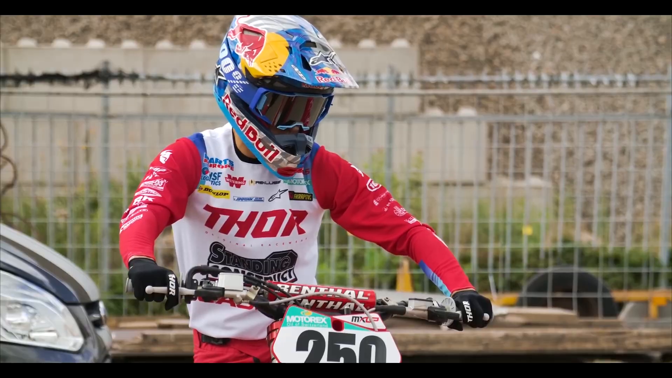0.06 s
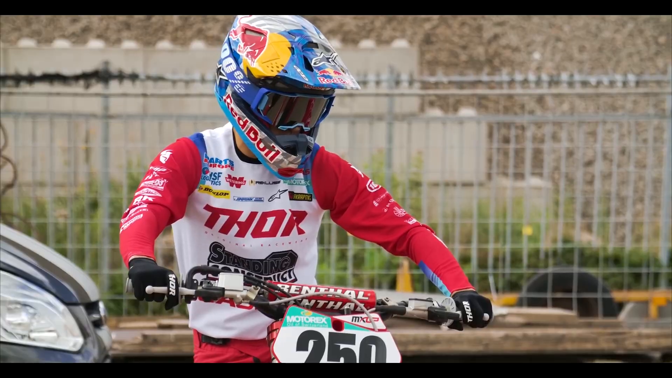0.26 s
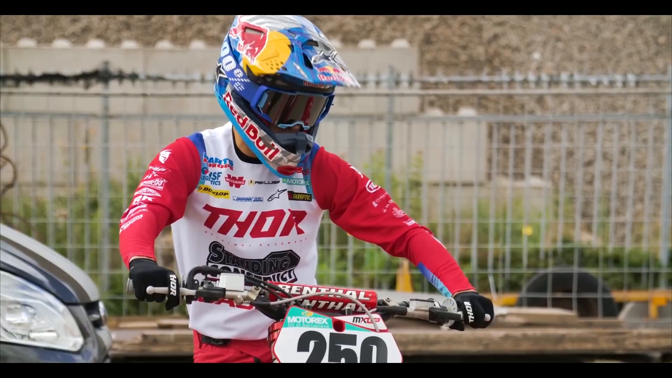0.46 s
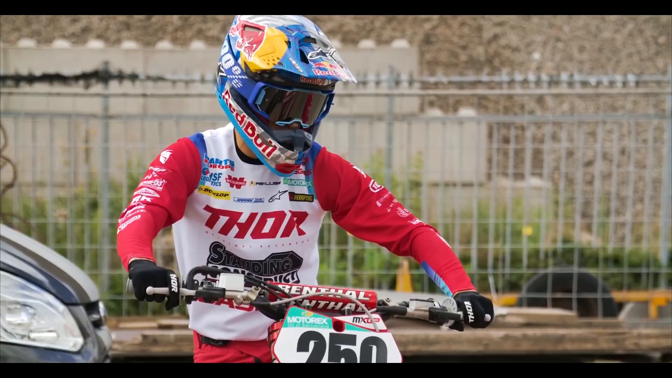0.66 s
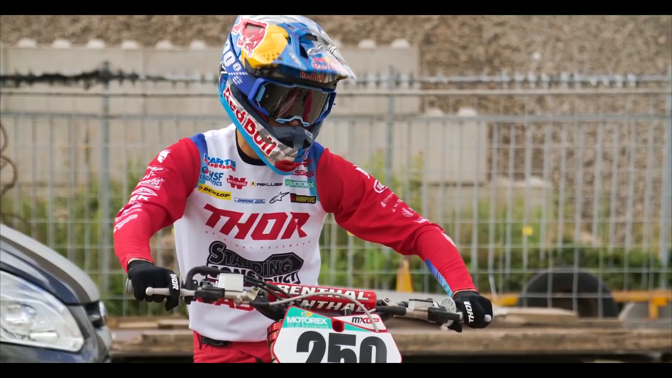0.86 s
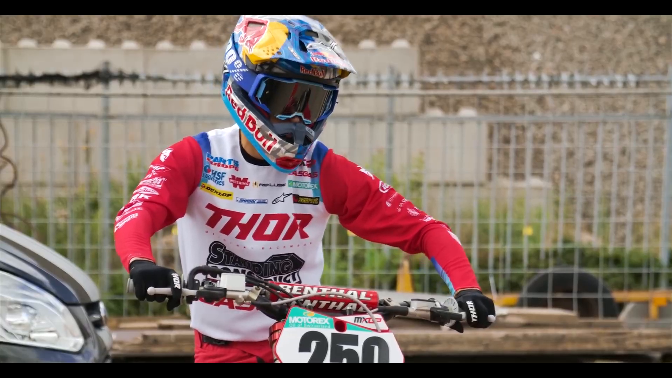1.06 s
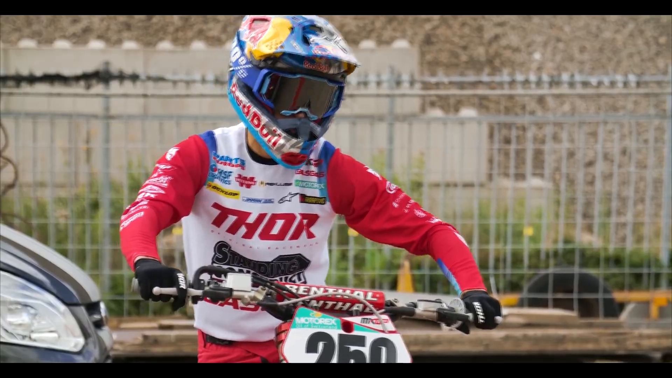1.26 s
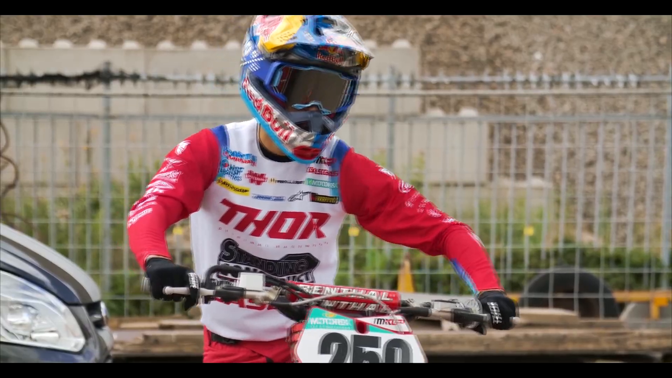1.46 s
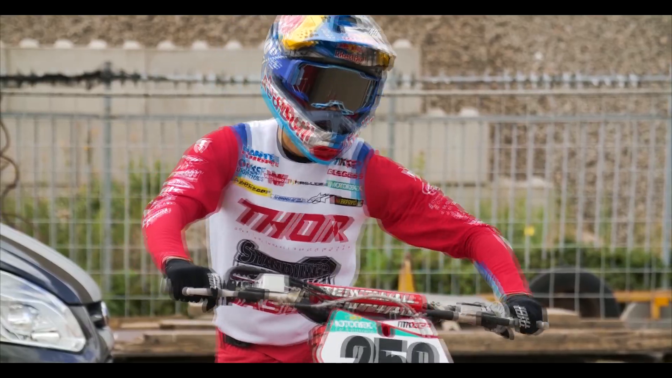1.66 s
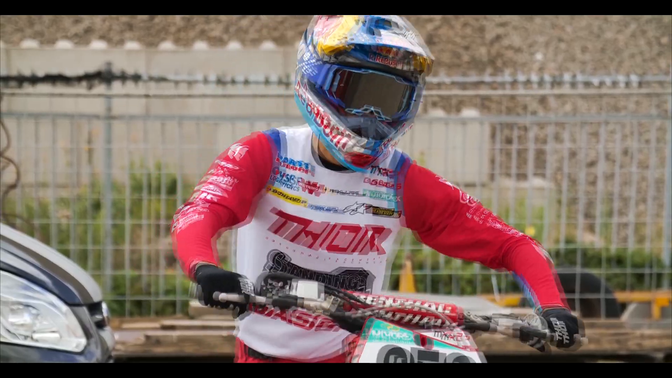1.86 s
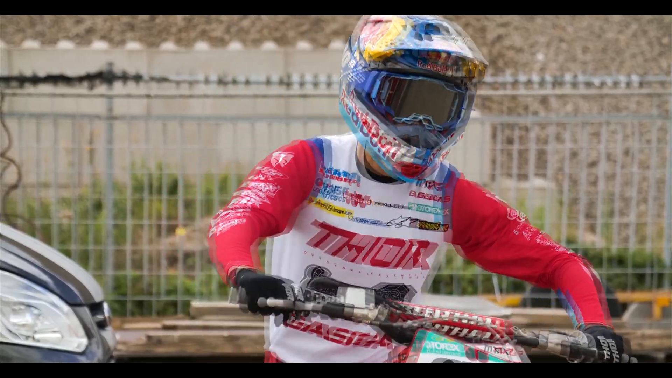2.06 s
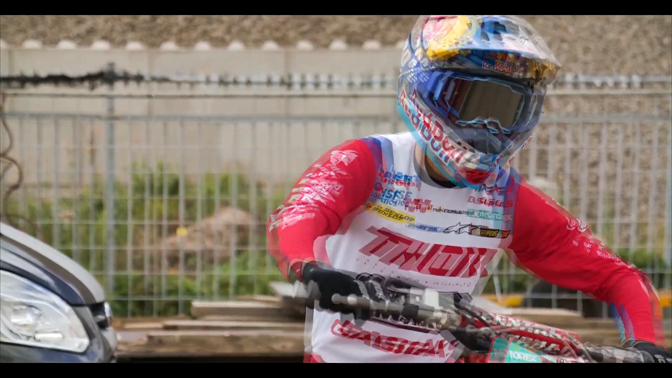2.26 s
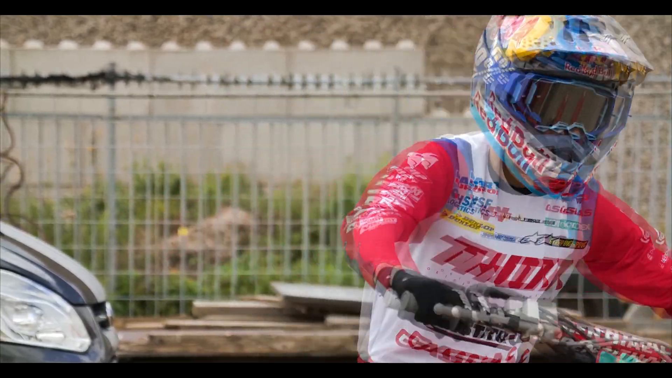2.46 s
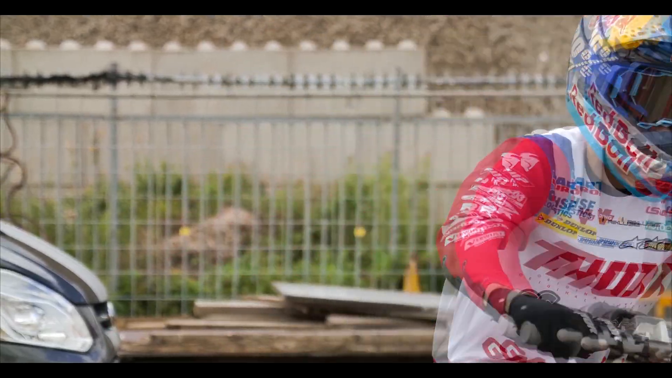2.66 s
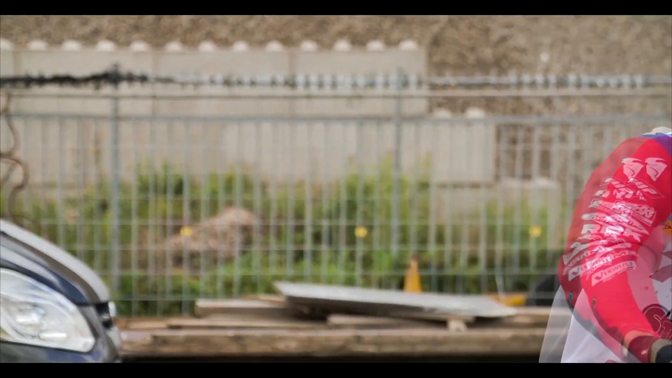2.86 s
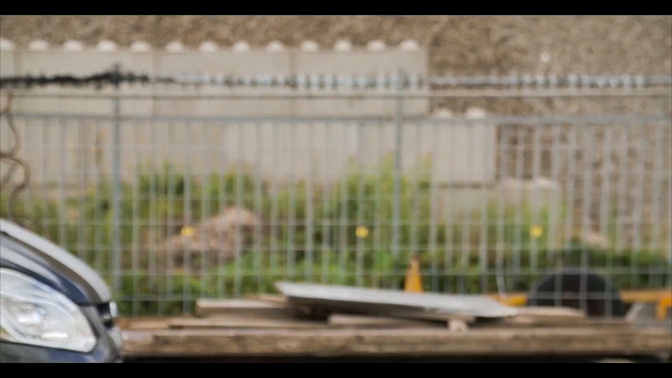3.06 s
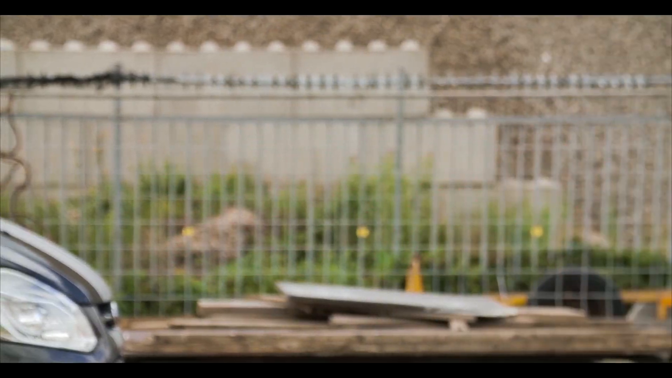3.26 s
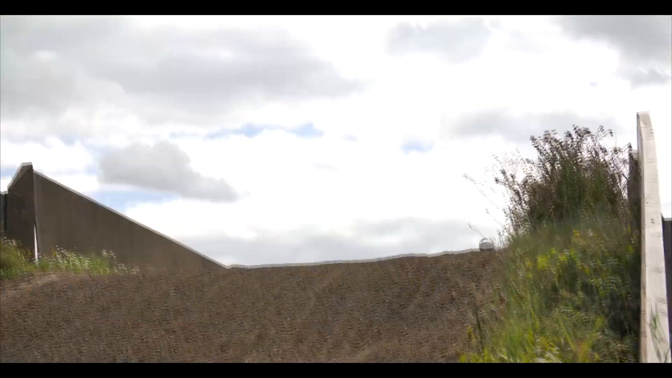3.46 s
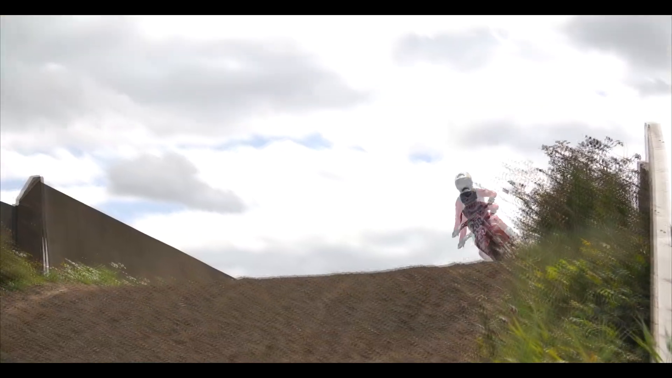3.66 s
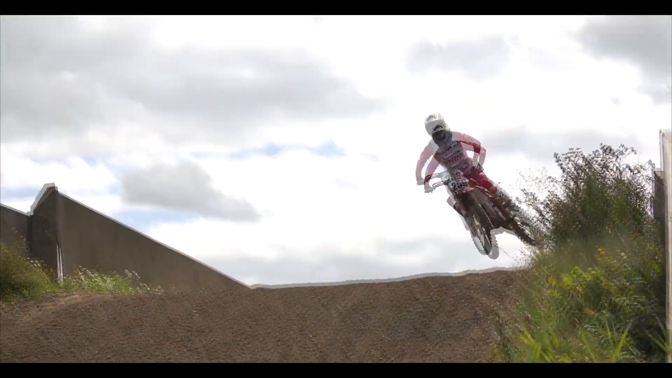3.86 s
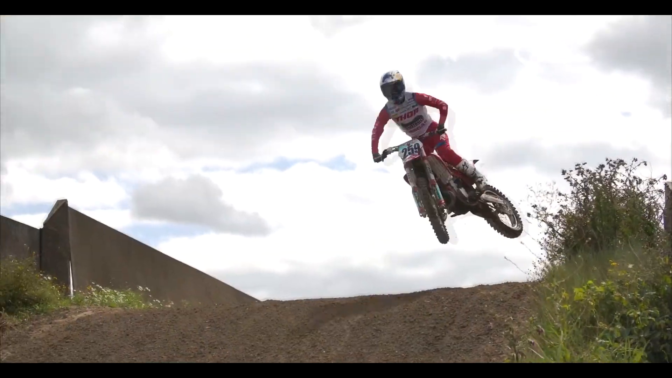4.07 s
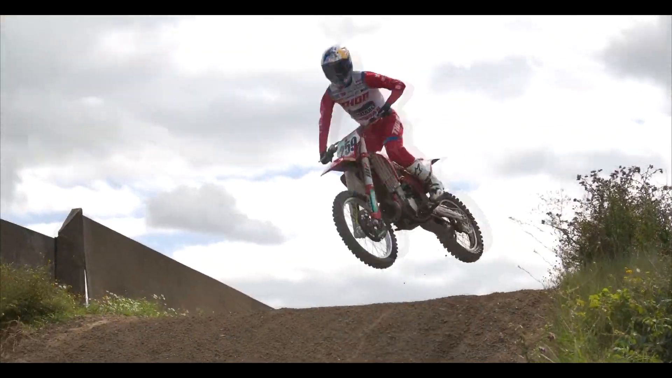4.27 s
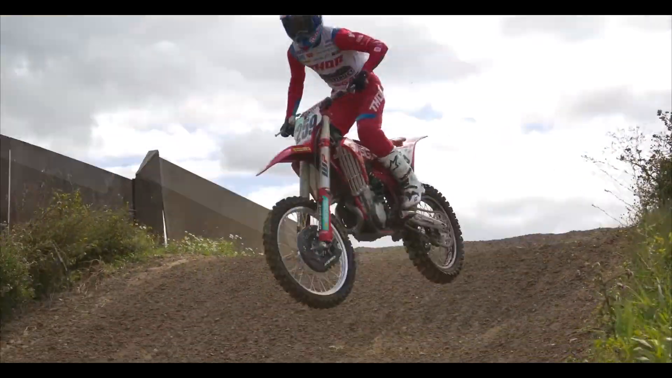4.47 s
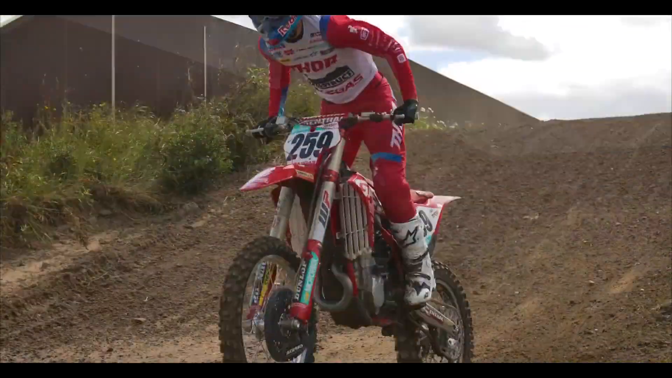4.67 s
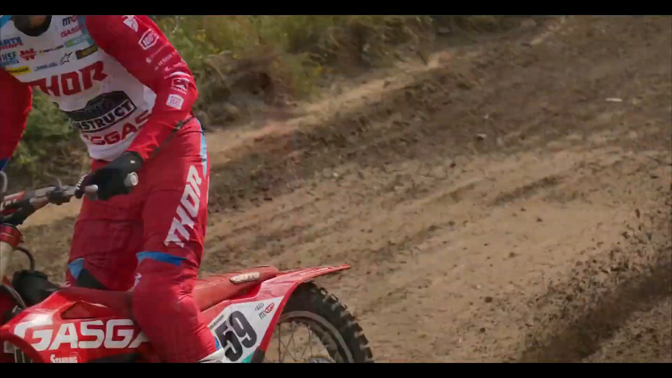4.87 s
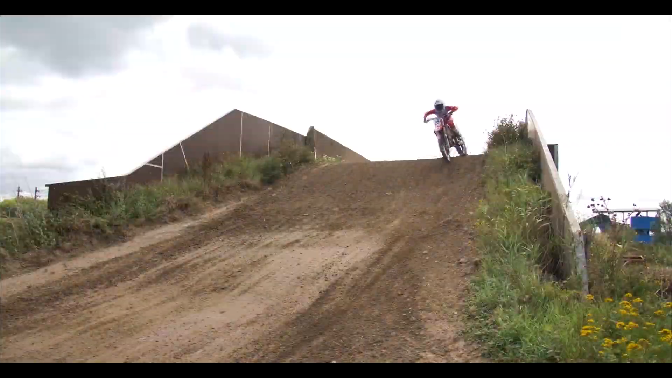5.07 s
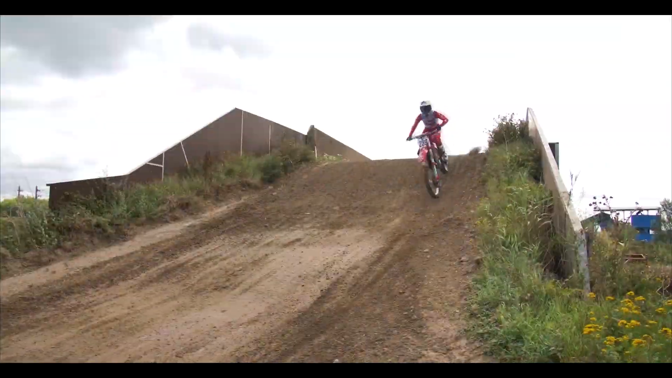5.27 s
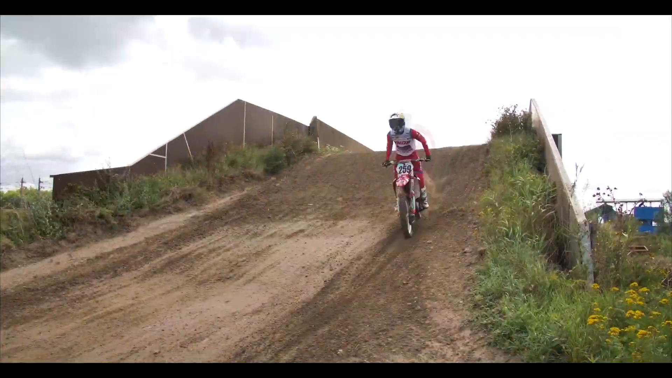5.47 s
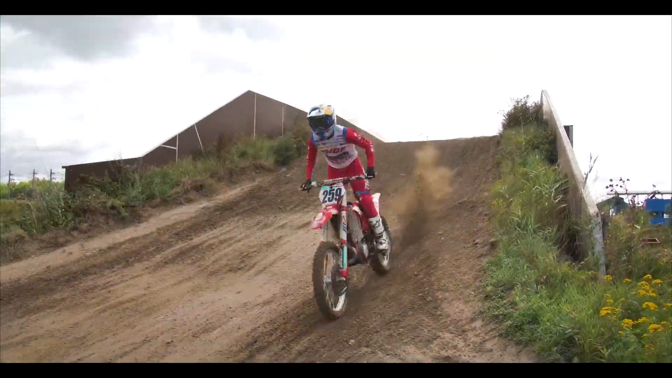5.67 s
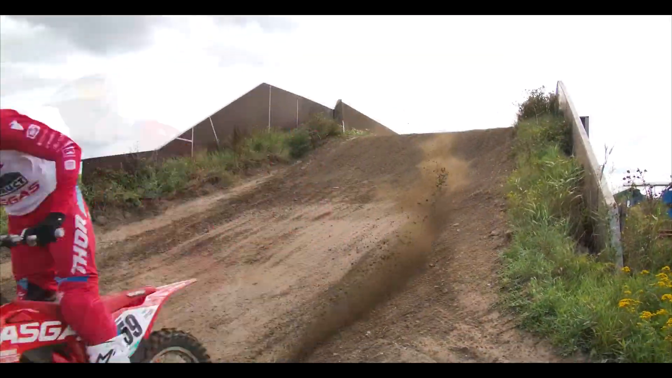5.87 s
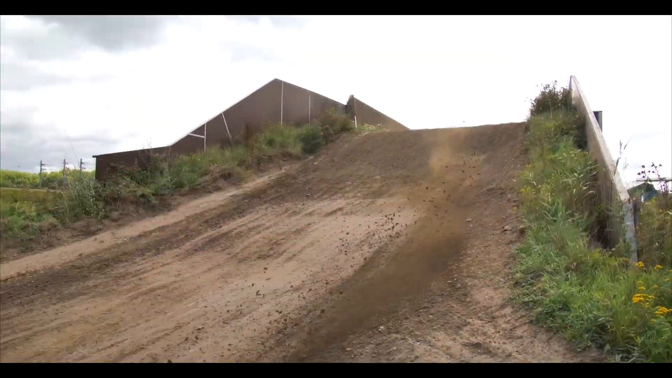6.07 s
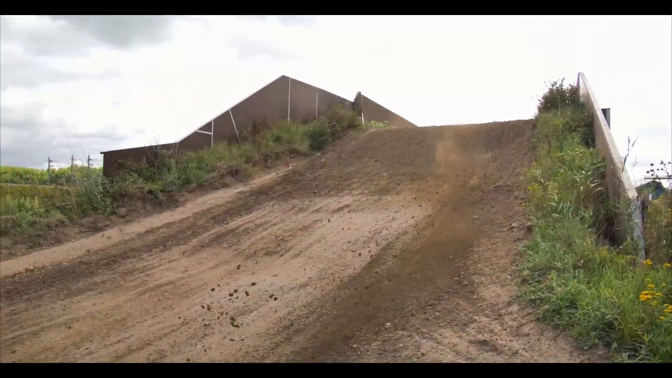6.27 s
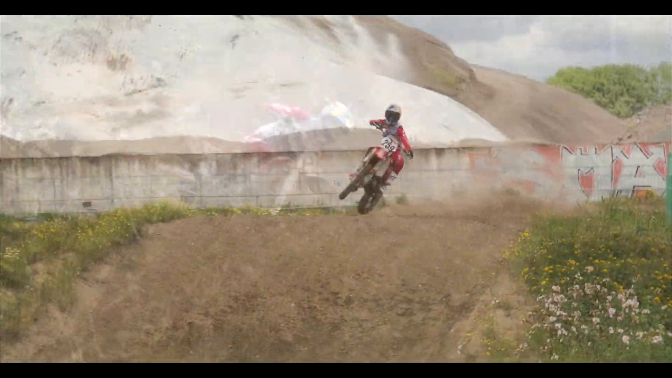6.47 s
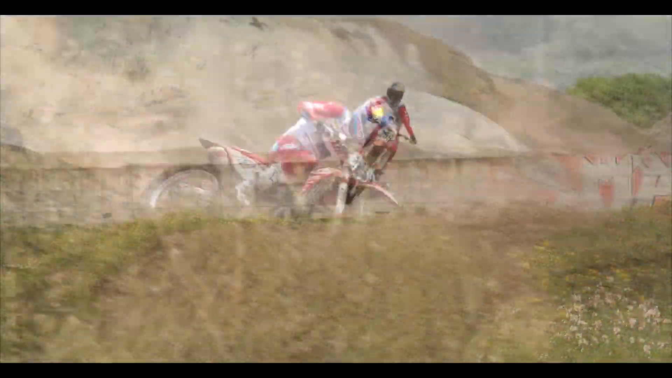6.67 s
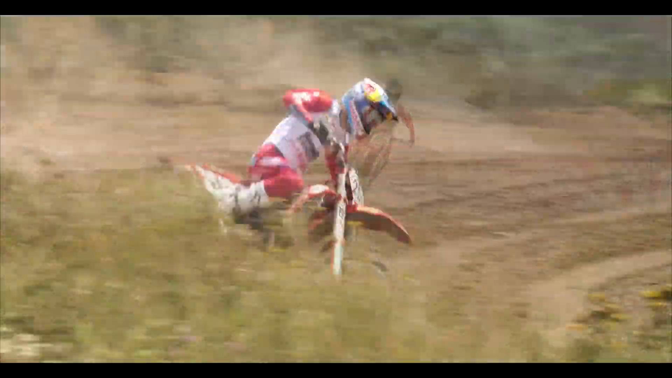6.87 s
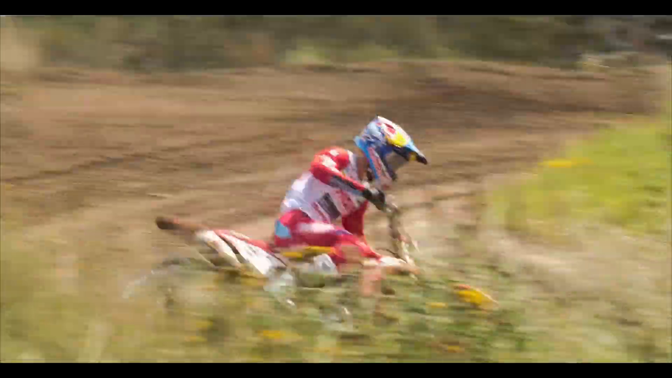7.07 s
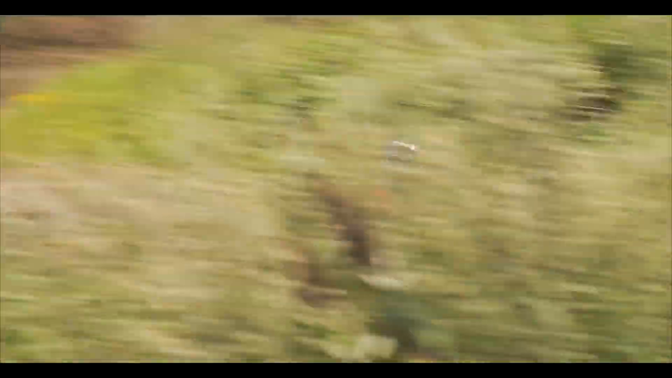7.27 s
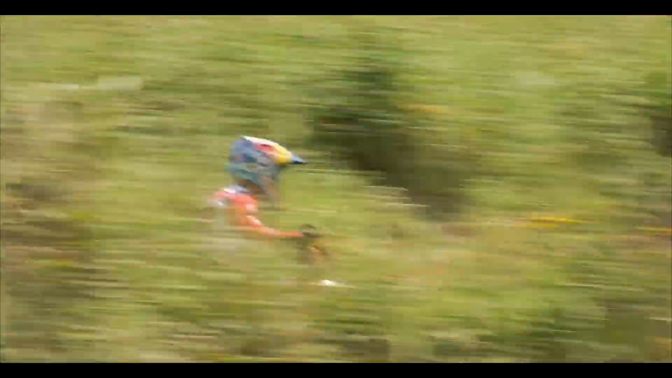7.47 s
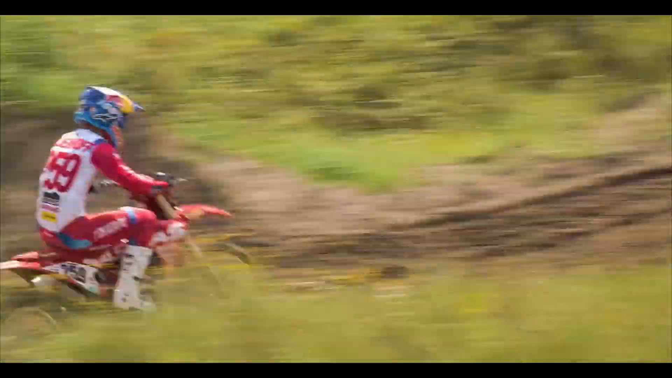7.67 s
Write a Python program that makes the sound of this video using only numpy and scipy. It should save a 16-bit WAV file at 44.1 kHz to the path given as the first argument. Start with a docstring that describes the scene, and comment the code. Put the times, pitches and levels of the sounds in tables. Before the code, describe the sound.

Close outdoor microphone on a four-stroke motocross bike: round idle thumps, ticking valves and whirring gears, a small gear clunk, then slightly faster thumping as it rolls off. A short throttle burst launches it over a jump, it coasts, then passes loudly twice with distorted peaks and ragged crackles. Finally it pulls out of a dirt bend with a hard, rasping bark, amid faint wind.

```python
"""An idling motocross bike thumps and clatters close to the microphone, clunks into gear and rolls away.
It then bursts up a ramp and coasts over a jump, passes hard twice, near enough to overload the
microphone, and drives out of a bend with a hard crack on every exhaust stroke.
A clock of four-stroke cycles times clicks and noise; resonances and filters turn them into exhaust,
silencer and engine cases. Dirt and banks echo the bike, and wind buffets the microphone."""
import sys
import numpy as np
from scipy import signal
from scipy.fft import rfft, irfft, next_fast_len
from scipy.io import wavfile
from scipy.ndimage import uniform_filter1d, map_coordinates

SR = 44100
rng = np.random.default_rng(int(sys.argv[2]) if len(sys.argv) > 2 else 0)


def output_pcm(signal):
    """Save a mono or channel-first signal as 16-bit PCM at the path in sys.argv[1].

    Samples are clipped to [-1, 1] before scaling.
    """
    pcm = np.clip(np.atleast_2d(signal).T, -1, 1) * 32767
    wavfile.write(sys.argv[1], SR, np.round(pcm).astype(np.int16))


N = 340893
T = np.arange(N) / SR

# colour of the open air: pitch_hz [Hz], density_db [dB per Hz, relative]
AIR_COLOUR = [(25, -16), (90, -1), (400, -17), (2000, -20), (14000, -65)]
# wind on the microphone: time_s [s], level_db [dB]
WIND_LEVEL = [(0, -62), (4.8, -85), (5.2, -61), (5.6, -82), (6.2, -57), (6.8, -55), (7.3, -66)]
# the bike droning beyond the ramp, one row: middle_s [s], level_db [dB], half_length_s [s]
FAR_DRONE = (3.63, -60.5, 0.44)
# hard cracks of single firings and bangs from the exhaust: start_s [s],
# level_db [dB before gain and filter]
CRACKS_AND_BANGS = [(5.262, -26), (5.276, -18), (5.3247, -24), (5.3462, -27), (5.379, -24), (5.3996, -30),
                    (5.4227, -30), (6.207, -16.5), (6.2384, -15), (6.2491, -21), (6.2713, -22),
                    (6.2924, -18.5)]
# ragged firing after each pass: middle_s [s], level_db [dB], half_length_s [s]
OVERRUNS = [(5.419, -40, 0.22), (6.386, -42.5, .2)]
# colour of that ragged firing: pitch_hz [Hz], density_db [dB per Hz, relative]
STUTTER_COLOUR = [(50, -20), (100, 3), (180, 10), (400, -1), (720, 2), (1150, -14), (2200, -36)]

# idle speed: time_s [s], rate [firings per second]
IDLE_RATE = [(0, 16.06), (.21, 17.02), (.78, 15.05), (1.16, 16.77), (1.54, 20.16), (1.88, 20.37),
             (2.22, 21.71), (2.55, 20.78), (2.85, 21.85), (3.2, 19.73), (3.37, 16.7), (3.75, 15.63)]
# whirr of gears and chain: pitch_hz [Hz], density_db [dB per Hz, relative]
GEAR_WHIRR_COLOUR = [(350, -20.5), (600, -4.5), (1300, 1), (2200, -7), (3100, -4.5), (4500, -9.5),
                     (9000, -19.5), (15000, -38)]
# ringing of the engine cases: pitch_hz [Hz], width_hz [Hz], level_db [dB, relative]
CASE_MODES = [(559, 33, -2.5), (741, 66, -1), (1059, 95, 1.5), (1365, 300, -1), (1775, 47, 2),
              (2102, 31, 4), (2250, 35, 0)]
# ringing of the valve gear: pitch_hz [Hz], width_hz [Hz], level_db [dB, relative]
VALVE_MODES = [(2990, 310, 1.5), (5870, 230, -4.5), (8860, 67, -25)]
# first gear engaging: start_s [s], level_db [dB before the filter]
GEAR_CLUNK = [(.476, -42.5)]

# underlying engine speed on the ride: time_s [s], rate [firings per second]
ROAD_RATE = [(3.866, 60.7), (4.01, 88.5), (4.645, 55), (4.737, 66.4), (5.714, 67.1), (6.389, 74.6),
             (6.8, 82.4), (7.09, 84.55), (7.36, 79.18), (7.48, 79.3), (7.575, 77), (7.65, 77.6),
             (7.69, 71.3), (7.73, 72.5)]
# brief rises and one sag of the revs: middle_s [s], change [firings per second], half_length_s [s]
REV_CHANGES = [(4.85, 28.6, .126), (4.999, 6.2, .038), (5.161, 14, .084), (5.382, 26.2, .17),
               (5.584, 32.8, .125), (5.864, 13.1, .101), (6.027, 14.6, .083), (6.221, 21.8, .22),
               (6.35, -6, .05), (6.424, 14.9, .057), (6.575, 13.2, .124), (6.748, 15.3, .078),
               (6.978, 15.95, .106), (7.287, 3.6, .251), (7.52, 6, .055)]
# throttle opening: time_s [s], throttle [0-1]
THROTTLE = [(4, 0.12), (4.08, 0.04), (4.66, 0.05), (4.78, 0.19), (6.6, 0.23)]
# uneven combustion: time_s [s], roughness [0-1, clipped there]
ROUGHNESS = [(3.85, 1.01), (4.05, 0.3), (4.85, 0.42), (5.2, 0.53), (5.45, 1.05), (5.75, 0.56), (6.15, 0.29),
             (6.35, 0.65), (6.55, 0.48), (7.3, 0.22)]
# exhaust colour with little throttle: pitch_hz [Hz], density_db [dB per Hz, relative]
COASTING_COLOUR = [(45, -30), (70, -15), (92, -16.5), (120, 2), (230, -9), (330, -19), (520, 4), (700, -2),
                   (1250, -10), (1800, -31)]
# exhaust colour driven past the microphone: pitch_hz [Hz], density_db [dB per Hz, relative]
PASSING_COLOUR = [(50, -45.5), (80, -13), (110, -7.5), (150, 8.5), (215, 15), (280, 9.5), (350, 3.5),
                  (480, 0.5), (700, -12), (1080, -12), (1800, -30)]
# exhaust colour driven out of the bend: pitch_hz [Hz], density_db [dB per Hz, relative]
CORNERING_COLOUR = [(45, -22.5), (82, -4), (170, 6), (250, 4.5), (340, 11.5), (420, 4), (520, -2.5),
                    (720, -14), (1050, -22), (1300, -21), (1800, -14)]
# colour of the rasping gas: pitch_hz [Hz], density_db [dB per Hz, relative]
RASP_COLOUR = [(710, -18.5), (1200, -2.5), (1460, -3.5), (2280, -4.5), (5790, -15.5), (10900, -31),
               (15500, -44)]
# a burst up the ramp, then coasting in the air: time_s [s], boom_db, bark_db, rasp_db [dB]
JUMP_LEVELS = [(3.77, -55, -67, -99), (3.84, -48, -61.5, -74), (3.94, -41.5, -48.5, -60.5),
               (3.99, -37, -49, -54.5), (4.06, -54.5, -53, -51), (4.28, -51, -54.5, -49),
               (4.5, -45.5, -51, -54), (4.67, -49, -56.5, -53.5)]
# hard passes: start_s, nearest_s, approach_s, retreat_s [s], behind_db [dB added to the boom once past],
# boom_db, bark_db, rasp_db, shock_db [dB at the nearest point; shock before its filter]
PASSES = [(4.648, 5.206, 0.3, 0.096, -6, -28.5, -31, -35, -28),
          (5.374, 6.129, 0.082, 0.043, -13, -23, -21.5, -28, -18.5)]
# fading with distance, one value each for boom, bark, rasp and shock [power of distance]
FALLOFF = [0.65, 1.335, 1.25, 1.3]
# driving out of the bend: time_s [s], boom_db, bark_db, rasp_db [dB before the dips]
BEND_LEVELS = [(6.35, -48, -49, -43), (6.55, -40.5, -46.5, -53), (6.78, -43, -51, -56.5),
               (6.9, -44, -50, -47), (7.05, -42.5, -51.5, -49), (7.27, -37, -41, -43),
               (7.45, -39, -44.5, -49), (7.6, -40.5, -46, -54), (7.72, -46, -38.5, -53.5)]
# brief dips in level in the bend: middle_s [s], level_db [dB]
DIPS = [(6.984, -7), (7.336, -8.5)]
# hard pulls steepening each pulse to a shock: middle_s [s], level_db [dB before dips and filter],
# half_length_s [s]
PULLS = [(5.236, -13, .06), (6.857, -25.5, 0.037), (7.24, -25.5, 0.22), (7.36, -22, 0.044),
         (7.455, -17, 0.12), (7.715, -20.5, 0.087)]
# the tailpipe howling as it swings toward the microphone: middle_s [s], pitch_hz [Hz], level_db [dB],
# half_length_s [s]
HOWLS = [(3.905, 328, -48.5, 0.31), (5.028, 339, -32, 0.19), (5.2, 576, -36, 0.12), (5.23, 94, -45, 0.21),
         (5.326, 458, -38.5, 0.15), (5.657, 364, -35.5, 0.15), (6.104, 591.6, -21.5, 0.066),
         (6.116, 344.7, -17.5, 0.077), (6.174, 452, -28.5, 0.2)]
# single exhaust harmonics singing out in the air, on a pass and in the bend: middle_s [s],
# multiple [of the firing rate], level_db [dB of sine peak, before wobble and dips], half_length_s [s]
WHINES = [(4.43, 14, -53, .09), (4.82, 8, -41, 0.077), (6.92, 13, -53, 0.09), (7.167, 12, -49, .21),
          (7.25, 13, -55, 0.23)]
# band the dirt echo reinforces, lower as the bike comes near: time_s [s], pitch_hz [Hz]
BARK_BAND = [(3.9, 790), (4.25, 1140), (4.5, 795), (4.84, 740), (4.92, 1160), (5.03, 1130), (5.12, 773),
             (5.24, 600), (5.5, 944), (5.86, 1060), (5.97, 790), (6.08, 586), (6.2, 836), (6.45, 647),
             (6.98, 1096), (7.45, 915), (7.7, 623)]
# flat-topped peak level: time_s [s], ceiling [amplitude]; sinks as one pass is faded into the next
CEILING = [(4.9, .088), (5.1, .072), (5.25, .056), (5.4, .043), (5.5, .091)]

OVERRUN_RATE, OVERRUN_SAG_PER_S = 57, 44  # firings per second at the middle, and how fast they fall

TICKOVER = 16  # reference idle, firings per second
THUMP_DB, THUMP_DB_PER_FIRING = -54.5, 0.96  # at tickover; rise with each firing per second
TRIP_S, TRIP_SHRINK = 0.00914, 0.36  # pipe round trip at tickover; hotter gas shortens it by this power
LEAVE_S, THUMP_FADE_DB_PER_S, CLATTER_FADE_DB_PER_S = 3.32, 7, 18  # rolling out of earshot
TURN_S, TURN_LENGTH_S, TURN_DB = 3.2, 0.065, -1.5  # the pipe turns away from the microphone
TICK_DB, TICK_FADE_DB_PER_S = -31.5, 33  # valve ticks as it leaves, before their filter
KNOCK_DB, VALVE_DB, GEARS_DB = -65.5, -79, -68.5  # parts of the clatter before the bike rolls past
NEAR_DB = 10  # rise of the gears as the bike rolls past
WHIRR_HZ, WHIRR_WIDTH_HZ, WHIRR_DB = 1327, 240, -65  # the dragging clutch

FULL_LOAD = 0.24  # throttle at which the engine pulls hard
PASS_RISE_S = 0.13  # a pass comes into earshot this fast
BEHIND_S = 0.15  # the intake boom faces forward and drops this fast once the bike is past
DIP_S = 0.036  # half length of a dip
HOWL_WIDTH_HZ = 51
HONK_HZ, HONK_WIDTH_HZ, HONK_PER_FIRING = 270.3, 70, 0.024  # airbox; gain per firing/s of rev change
SPREAD_S_PER_HZ = 2.6e-5  # the pipe smears each boom: its upper tones come later
BARK_WIDTH_HZ, BARK_FOCUS = 310, 0.94  # moving band; its strength over the rest of the bark
BOUNCE_GAIN = 0.22  # echo off the dirt
BLAST_DB, BLAST_HZ, BLAST_WIDTH_HZ = -5, 950, 1080  # relative to the bark gain, at full load
TOP_HZ = 15700  # band limit of the microphone


def amp(db):
    """Decibels to gain."""
    return 10 ** (np.asarray(db) / 20)


def unit(x):
    """Scaled to rms 1."""
    return x / np.sqrt(np.mean(x ** 2) + 1e-20)


def steady(x, size=1800):
    """Held near rms 1 by a sliding power average, size samples long and applied twice."""
    power = np.abs(uniform_filter1d(uniform_filter1d(x * x, size), size))
    return x / np.sqrt(power + 1e-4 * power.mean())


def curves(rows):
    """One value per sample for each column after the time."""
    s, *cols = np.transpose(rows)
    return [np.interp(T, s, c) for c in cols]


def ramp(start, end):
    """Rises from 0 to 1 between two times."""
    return np.clip((T - start) / max(end - start, 1e-3), 0, 1)


def swell(at, half):
    """A smooth rise to 1 and fall around one time."""
    return np.cos(np.pi / 2 * np.clip((T - at) / half, -1, 1)) ** 2


def filtered(x, response):
    """x times a complex response of frequency."""
    m = 2 * next_fast_len(N // 2 + SR // 4)
    return irfft(rfft(x, m) * response(np.fft.rfftfreq(m, 1 / SR)), m)[:N]


def coloured(x, points):
    """x through the causal (minimum-phase) filter with these (Hz, dB) points."""
    f, db = np.transpose(points)

    def response(hz):
        level_db = np.interp(np.log(hz + 1), np.log(f), db)
        cepstrum = irfft(np.log(amp(np.maximum(level_db, -100))))
        # folding the cepstrum onto positive time makes the filter causal
        cepstrum[1:len(cepstrum) // 2] *= 2
        cepstrum[len(cepstrum) // 2 + 1:] = 0
        return np.exp(rfft(cepstrum))
    return filtered(x, response)


def resonance(f, hz, width):
    """Response of one damped mode."""
    return 1j * f * width / (hz * hz - f * f + 1j * f * width)


def lowpass(f, hz, order=8):
    """Gain of a steep low-pass."""
    return 1 / (1 + (f / hz) ** order)


def narrowed(x, hz, width):
    """x through two equal damped modes in a row."""
    return filtered(x, lambda f: resonance(f, hz, width) ** 2)


def rung(x, modes):
    """x through a body with these (Hz, width Hz, dB) modes, at rms 1."""
    def body(f):
        return sum(amp(db) * resonance(f, hz, width) for hz, width, db in modes)
    return unit(filtered(x, body))


def noise():
    """White noise."""
    return rng.standard_normal(N)


def dying_noise(length, t60):
    """Noise of length samples, falling 60 dB in t60 seconds."""
    return rng.standard_normal(length) * amp(-60 * T[:length] / t60)


def wobble(rate):
    """A smooth random curve, rate knots a second."""
    return map_coordinates(rng.standard_normal(int(N * rate / SR) + 4), [T * rate])


def strokes(cycle, at):
    """Times at which the engine passes one point of its cycle."""
    return np.interp(np.arange(int(cycle[-1] - at) + 1) + at, cycle, T)


def impulses(times, sizes):
    """A click at each time, shared between the two nearest samples."""
    at = np.clip(times * SR, 0, N)
    i = at.astype(int)
    early = np.bincount(i, sizes * (1 - at + i), N + 2)
    late = np.bincount(i + 1, sizes * (at - i), N + 2)
    return (early + late)[:N]


def scatter(times, spread_db):
    """A random gain for each stroke."""
    return amp(spread_db * rng.standard_normal(len(times)))


def bursts(rows, t60):
    """Noise that starts at each (s, dB) and dies away."""
    return noise() * sum(amp(db - 60 * np.maximum(T - s, 0) / t60) * (T >= s) for s, db in rows)


def window(cycle, at, width):
    """A smooth bump once a cycle."""
    return np.exp(-(np.sin(np.pi * (cycle - at)) / (np.pi * width)) ** 2)


def after(cycle, at, rise, fall):
    """A quick rise and slower fall once a cycle; lengths in cycles."""
    age = (cycle - at) % 1
    return (1 - np.exp(-age / rise)) * np.exp(-age / fall)


def delayed(x, lag):
    """x heard later by a changing lag in seconds."""
    return map_coordinates(x, [(T - lag) * SR], order=1)


def outdoors():
    """Faint open air, and wind lumps on the microphone as low noise of wandering strength."""
    air = amp(-67) * unit(coloured(noise(), AIR_COLOUR))
    rumble = filtered(noise(), lambda f: resonance(f, 64, 70) * lowpass(f, 220, order=4))
    lumps = unit(rumble * amp(6.1 * wobble(2.42)))
    return air + amp(curves(WIND_LEVEL)[0]) * lumps


def banks(x, t60=.25, wet_db=-24):
    """Earth banks and walls scatter a short, dull answer."""
    tail = dying_noise(SR // 2, t60) * (T[:SR // 2] > .012)
    answer = signal.fftconvolve(x, tail / np.linalg.norm(tail))[:N]
    return amp(wet_db) * filtered(answer, lambda f: lowpass(f, 3800, order=2))


def far_bike():
    """Behind the ramp only a blurred, low drone gets through."""
    s, db, half = FAR_DRONE
    return amp(db) * swell(s, half) * steady(narrowed(noise(), 193, 175))


def cracks_and_bangs():
    """Hard cracks of single firings and bangs from the exhaust, as short broad bursts of noise."""
    tone = lambda f: resonance(f, 1500, 3000) * lowpass(f, 4900, order=3)
    return amp(6.0) * filtered(bursts(CRACKS_AND_BANGS, t60=0.02), tone)


def overrun():
    """The departing engine fires raggedly as its revs sink."""
    out = np.zeros(N)
    for s, db, half in OVERRUNS:
        rate = OVERRUN_RATE - OVERRUN_SAG_PER_S * np.clip(T - s, -half, half)
        times = strokes(np.cumsum(rate) / SR, at=0)
        i = (times * SR).astype(int)
        pops = impulses(times + .0004 * wobble(200)[i], amp(7.4 * wobble(150)[i]))
        ragged = steady(coloured(unit(pops) + 0.45 * noise(), STUTTER_COLOUR))
        out += amp(db) * swell(s, half) * ragged
    return out


def idle_exhaust(cycle, rate, thump_hz=172, round_hz=320, echoes=(1, .95, .33, .1), echo_hz=340,
                 edge=0.26, hum_hz=99, hum_share=0.52):
    """Each slow firing sends a round thump up and down the pipe, duller on every trip."""
    times = strokes(cycle, at=0.425)
    sizes = scatter(times, spread_db=0.5)
    speed = np.interp(times, T, rate)
    trip = TRIP_S * (TICKOVER / speed) ** TRIP_SHRINK * scatter(times, spread_db=0.27)

    def thump(f):
        body = resonance(f, thump_hz, 196)
        return body * lowpass(f, round_hz, order=6) * (1 - lowpass(f, 48, order=5))

    pipe = np.zeros(N)
    for k, gain in enumerate(echoes):
        arrivals = impulses(times + k * trip, gain * sizes * scatter(times, spread_db=1.16))
        pipe += filtered(arrivals, lambda f: thump(f) * lowpass(f, echo_hz, order=4) ** (k * k))
    # taking up the load gives the first blow a harder edge
    load = ramp(2.0, 3.05)
    crack = narrowed(impulses(times, sizes * np.interp(times, T, load)), 390, 345)
    # the silencer's cavity hums on between firings, more under load
    hum = (1 + 1.55 * load) * filtered(pipe, lambda f: resonance(f, hum_hz, 19))
    # its baffles swallow a band just above the hum
    baffles = lambda f: 1 - .7 * resonance(f, 131.7, 38)
    return unit(filtered(pipe + edge * crack + hum_share * hum, baffles))


def idle_clatter(cycle):
    """A valve ticks, then combustion knocks on the cases and leaves a dull chuff, over whirring gears."""
    near_db = NEAR_DB * ramp(1.0, 3.8)
    ticks, knocks = strokes(cycle, at=0.015), strokes(cycle, at=.18)
    tick = unit(impulses(ticks, scatter(ticks, spread_db=1.5)))
    tick = tick + unit(noise() * window(cycle, at=0.0089, width=0.065))
    valves = amp(VALVE_DB + 0.92 * near_db) * rung(tick, VALVE_MODES)

    rattle = unit(noise() * after(cycle, at=0.17, rise=0.031, fall=0.096))
    knock = unit(impulses(knocks, scatter(knocks, spread_db=0.5))) + 1.5 * rattle
    breath = noise() * after(cycle, at=0.193, rise=.02, fall=0.67)
    chuff = unit(filtered(breath, lambda f: lowpass(f, 2200, order=3)))
    cases = rung(knock + 1.05 * chuff, CASE_MODES)
    cases = filtered(cases, lambda f: lowpass(f, 2900, order=3))
    cases = cases + 0.28 * unit(narrowed(rattle, 2020, 2040))

    # the cam chain rattles in much the same way on every turn
    chain = dying_noise(SR // 20, t60=0.45)
    turns = impulses(ticks, scatter(ticks, spread_db=1))
    chain_rattle = unit(signal.fftconvolve(turns, chain)[:N])
    gears = unit(coloured(noise() + 1.3 * chain_rattle, GEAR_WHIRR_COLOUR))
    return amp(KNOCK_DB) * cases + valves + amp(GEARS_DB + near_db) * gears


def turned_away(thump, cycle, turned):
    """With the pipe facing away, each thump arrives dull and smeared by the yard."""
    smear = thump + 7 * noise() * after(cycle, at=0.49, rise=0.041, fall=1.0)
    dull = filtered(smear, lambda f: lowpass(f, 205, order=3) * (1 - lowpass(f, 52, order=4)))
    return (1 - turned) * thump + turned * unit(dull)


def idle():
    """The bike ticks over, clunks into gear, picks up and rolls off; more speed makes a louder thump."""
    rate, = curves(IDLE_RATE)
    cycle = np.cumsum(rate) / SR
    gone_s = np.maximum(T - LEAVE_S, 0)
    turned = ramp(TURN_S, TURN_S + TURN_LENGTH_S)
    thump_db = THUMP_DB + THUMP_DB_PER_FIRING * (rate - TICKOVER)
    thump_db = thump_db + TURN_DB * turned - THUMP_FADE_DB_PER_S * gone_s
    thump = turned_away(idle_exhaust(cycle, rate), cycle, turned)
    exhaust = amp(thump_db) * thump * (1 - ramp(3.54, 3.9))
    clatter = amp(-CLATTER_FADE_DB_PER_S * gone_s) * idle_clatter(cycle)

    clutch = unit(narrowed(noise(), WHIRR_HZ, WHIRR_WIDTH_HZ))
    clutch = amp(WHIRR_DB) * swell(2.4, 1.0) * clutch
    clunk = lambda f: resonance(f, 1150, 2200) * lowpass(f, 7000, order=3)
    gear = filtered(bursts(GEAR_CLUNK, t60=0.12), clunk)
    taps = [(s, TICK_DB - TICK_FADE_DB_PER_S * (s - LEAVE_S))
            for s in strokes(cycle, at=.08) if 3.32 < s < 3.75]
    valve = lambda f: resonance(f, 2320, 260.0) * lowpass(f, 9400, order=3)
    ticks = filtered(bursts(taps, t60=0.034), valve)
    return (exhaust + clatter) * (1 - ramp(3.3, 4.1)) + clutch + gear + ticks


def dips():
    """Gain of the brief dips in the bend."""
    return amp(sum(db * swell(s, DIP_S) for s, db in DIPS))


def riding_levels():
    """Gains of boom, bark, rasp and shock: the jump, two passes that follow distance, and the bend."""
    jump = amp(curves(JUMP_LEVELS)) * (1 - ramp(4.67, 4.671))
    bend = dips() * amp(curves(BEND_LEVELS)) * ramp(6.29, 6.4)
    pulls = dips() * sum(amp(db) * swell(s, half) for s, db, half in PULLS)
    power = np.vstack([jump + bend, pulls]) ** 2
    for start, nearest, approach, retreat, behind_db, *peak_db in PASSES:
        # distance is 1 at the nearest point
        distance = np.hypot(1, (T - nearest) / np.where(T < nearest, approach, retreat))
        gains = np.array([amp(db) / distance ** fall for db, fall in zip(peak_db, FALLOFF)])
        gains[0] *= amp(behind_db * ramp(nearest, nearest + BEHIND_S))
        heard = ramp(start, start + PASS_RISE_S) * (1 - ramp(nearest + 0.4, nearest + 0.58))
        power += (gains * heard) ** 2
    return np.sqrt(power)


def ground_bounce(x, gain=BOUNCE_GAIN):
    """The echo off the dirt lags more as the bike comes near, so notches sweep through the tone."""
    return (x + gain * delayed(x, 1 / curves(BARK_BAND)[0])) / np.hypot(1, gain)


def heard_across_track(bark, wall_lags=(.0029, .0047, .0083), wall_gain=0.27, airborne_gain=.45,
                       drift_s=0.00062):
    """Drifting wall echoes, strongest in the air, roughen the harmonics; one moving band stands out."""
    walls = wall_gain + airborne_gain * (1 - ramp(4.6, 4.7))
    bark = bark + walls * sum(delayed(bark, lag + drift_s * wobble(3)) for lag in wall_lags)
    # shift the moving band down to 0 Hz, smooth it there and shift it back
    turn = np.exp(2j * np.pi * np.cumsum(curves(BARK_BAND)[0]) / SR)
    memory = np.exp(-np.pi * BARK_WIDTH_HZ / SR)
    band = np.real(turn * signal.lfilter([1], [1, -memory], bark / turn))
    return steady(steady(ground_bounce(bark)) + BARK_FOCUS * steady(band))


def exhaust_note(pulses, throttle):
    """Pulses through airbox and silencer, whose tone changes with throttle and heading."""
    bend = ramp(6.55, 7.22)
    passing = steady(coloured(pulses, PASSING_COLOUR))
    cornering = steady(coloured(pulses, CORNERING_COLOUR))
    driven = (1 - bend) * passing + bend * cornering
    load = np.clip(throttle / FULL_LOAD, 0, 1)
    return load * driven + (1 - load) * steady(coloured(pulses, COASTING_COLOUR))


def intake_boom(swing, rough, throttle, rev_change, split_hz):
    """The low note, smeared by the pipe, with an airbox honk in step with each change of the revs."""
    boom = exhaust_note(swing + .6 * rough * noise(), throttle)

    def smear(f):
        phase = -np.pi * SPREAD_S_PER_HZ * (f - HONK_HZ) ** 2
        return lowpass(f, split_hz, order=14) * np.exp(1j * phase)
    honk = HONK_PER_FIRING * rev_change * steady(narrowed(swing, HONK_HZ, HONK_WIDTH_HZ))
    return steady(filtered(boom, smear)) + honk


def exhaust_bark(blows, gas, rough, throttle, split_hz, bark_hz):
    """The middle of the exhaust note: sharp blows mixed with rushing gas."""
    bark = exhaust_note(blows + .9 * rough * unit(gas * noise()), throttle)
    middle = lambda f: (1 - lowpass(f, split_hz, order=14)) * lowpass(f, bark_hz)
    return steady(filtered(bark, middle))


def exhaust_rasp(blows, gas, throttle):
    """The jet tears into ragged crackles, and the silencer rings alike after every blow."""
    ringing = unit(signal.fftconvolve(blows, dying_noise(SR // 50, t60=0.011))[:N])
    crackle = unit(gas * noise() * amp(4.1 * throttle * wobble(900)))
    return steady(coloured(crackle + 1.2 * throttle * ringing, RASP_COLOUR))


def exhaust_blast(blows, cycle, rough, throttle):
    """The short blast of each firing under load."""
    burst = unit(noise() * after(cycle, at=0, rise=0.012, fall=0.092))
    blast = steady(narrowed(blows + 1.7 * rough * burst, BLAST_HZ, BLAST_WIDTH_HZ))
    return amp(BLAST_DB) * np.clip(throttle / FULL_LOAD, 0, 1) * blast


def exhaust_shock(times, rough, shock_gain):
    """Hard pulls steepen each pulse into a sudden front that dies within a few milliseconds."""
    spread_db = 4 * np.interp(times, T, rough)
    fronts = impulses(times, scatter(times, spread_db)) * shock_gain
    tails = signal.lfilter([1], [1, -np.exp(-1 / (0.00065 * SR))], fronts)

    def pipe_mouth(f):
        modes = resonance(f, 1050, 4500) + 1.1 * resonance(f, 2260, 810)
        return modes * lowpass(f, 8500, order=3)
    return ground_bounce(-filtered(tails, pipe_mouth))


def tailpipe_howl(swing):
    """Narrow resonances of the pulse train swell as the tailpipe swings toward the microphone."""
    return sum(amp(db) * swell(s, half) * steady(narrowed(swing, hz, HOWL_WIDTH_HZ))
               for s, hz, db, half in HOWLS)


def exhaust_whine(cycle):
    """Single harmonics sing out as a rough, gliding whine."""
    whine = np.zeros(N)
    for s, multiple, db, half in WHINES:
        tone = np.sin(2 * np.pi * multiple * cycle + .5 * wobble(50))
        whine += amp(db + 2 * wobble(25)) * swell(s, half) * tone
    return whine * dips()


def ride(split_hz=430, bark_hz=1600, lag=0.00548, blow_cycles=0.09):
    """Every cycle booms, then the exhaust valve opens with a shock and a jet of rasping gas."""
    rev_change = sum(change * swell(s, half) for s, change, half in REV_CHANGES)
    rate = (curves(ROAD_RATE)[0] + rev_change) * (1 + .0004 * wobble(30))
    cycle = .5 + np.cumsum(rate) / SR
    times = strokes(cycle, at=0)
    throttle = np.clip(curves(THROTTLE)[0], 0, 1)
    rough = np.clip(curves(ROUGHNESS)[0], 0, 1)
    boom_gain, bark_gain, rasp_gain, shock_gain = riding_levels()

    # the jet is strongest just after the valve opens; less throttle leaves more of an even whirr
    jet = after(cycle, at=0, rise=.02, fall=blow_cycles) * amp(3.5 * wobble(110))
    gas = .38 + 5 * throttle * jet
    jitter_s = .0003 * np.interp(times, T, rough) * rng.standard_normal(len(times))
    swing = unit(impulses(times - lag + jitter_s, scatter(times, spread_db=1.3)))
    blow_times = times + 2e-5 * rng.standard_normal(len(times))
    blows = unit(impulses(blow_times, scatter(times, spread_db=1)))

    boom = intake_boom(swing, rough, throttle, rev_change, split_hz)
    bark = exhaust_bark(blows, gas, rough, throttle, split_hz, bark_hz)
    rasp = exhaust_rasp(blows, gas, throttle)
    blast = exhaust_blast(blows, cycle, rough, throttle)
    engine = boom_gain * boom + rasp_gain * ground_bounce(rasp)
    engine = engine + bark_gain * (0.9 * heard_across_track(bark) + ground_bounce(blast))
    shock = exhaust_shock(times, rough, shock_gain)
    return ramp(3.74, 3.83) * (engine + shock + tailpipe_howl(swing) + exhaust_whine(cycle))


def scene():
    """The bike, its echo and the open air."""
    bike = far_bike() + cracks_and_bangs() + overrun() + idle() + ride()
    return (outdoors() + banks(bike) + bike)[None]


def record(dry, hardness=6):
    """The loudest peaks are flattened at a ceiling; nothing is kept above the band limit."""
    x = dry[0]
    clipped = x / (1 + np.abs(x / curves(CEILING)[0]) ** hardness) ** (1 / hardness)
    return filtered(clipped, lambda f: f < TOP_HZ)[None]


dry = scene()
out = record(dry)
output_pcm(out)
```